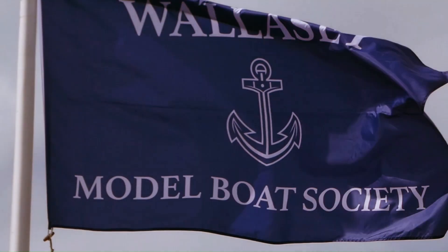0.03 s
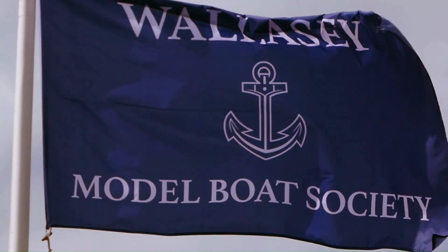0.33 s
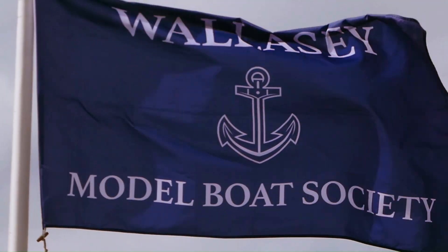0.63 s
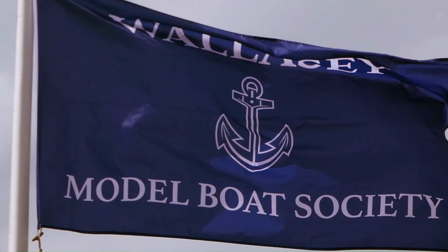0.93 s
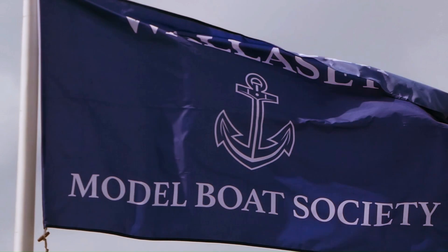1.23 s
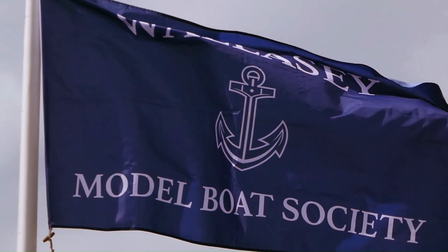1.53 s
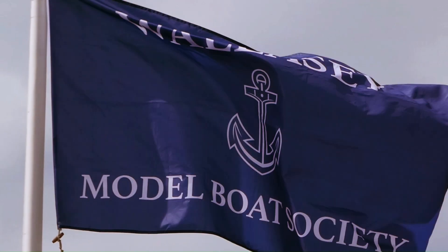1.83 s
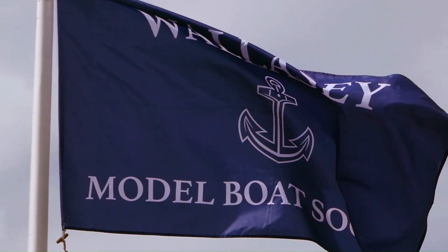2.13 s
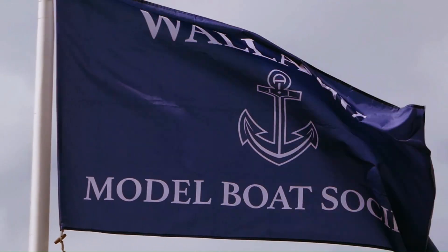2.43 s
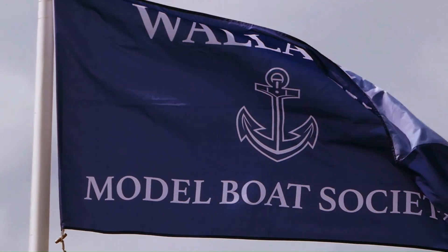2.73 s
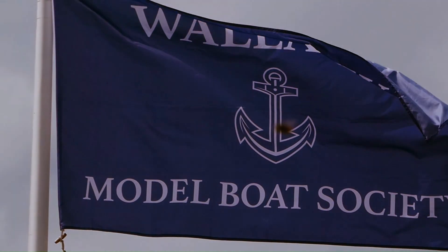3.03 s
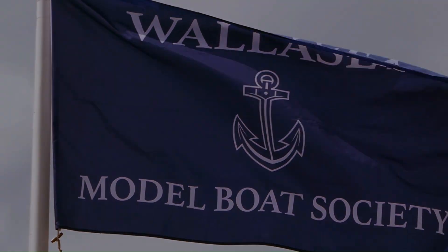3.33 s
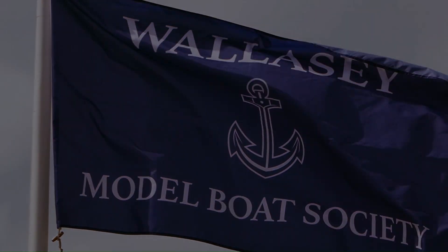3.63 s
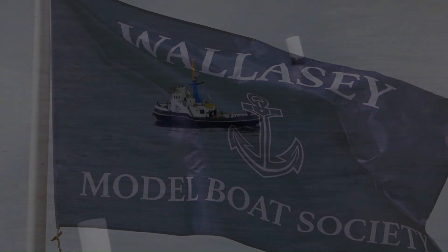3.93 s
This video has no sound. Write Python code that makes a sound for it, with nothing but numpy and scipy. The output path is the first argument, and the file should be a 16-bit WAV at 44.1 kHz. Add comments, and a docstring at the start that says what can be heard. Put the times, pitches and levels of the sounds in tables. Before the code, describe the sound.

A cloth flag flaps and snaps in gusty wind that buffets the microphone.

```python
"""Outdoors, close to a cloth flag in a gusty wind. About three times a second a fold runs out to the
free edge, swishing as it slides, and whips over: a pressure pulse, heard as a dull snap, followed by a
short flutter and a deep whump. Small creases pop in between, and the hem gives a few bright ticks.
Eddies buffet the microphone over a faint outdoor hiss, and the sound fades away at the end."""
import sys
import numpy as np
from scipy import signal
from scipy.fft import rfft, irfft
from scipy.io import wavfile

SR = 44100
rng = np.random.default_rng(int(sys.argv[2]) if len(sys.argv) > 2 else 0)


def materialize(psi):
    """Save the field psi as 16-bit PCM at rate SR to the path in sys.argv[1].

    A 1-D psi becomes a single channel; in a 2-D psi each row is a channel.
    """
    bounded = np.clip(np.atleast_2d(psi).T, -1, 1)
    quanta = np.round(bounded * 32767).astype(np.int16)
    wavfile.write(sys.argv[1], SR, quanta)


N = 176400
TIME = np.arange(N) / SR

# The cloth whips taut: (time [s], level before the low cut [dB], pulse width [ms],
# flutter relative to that level [dB], suction relative to the push [ratio])
SNAPS = [(0.064, -24.5, 1.38, -24, .85), (0.566, -35, 1.4, -22, 0), (0.5988, -30, 0.66, -15.5, 0.7),
         (0.615, -26.5, 0.87, -22, 0.07), (0.701, -28, 2.73, -25, 0.66), (0.951, -24.5, 0.26, -33, .1),
         (0.9599, -21, 1.26, -19, 0.1), (0.998, -23, 0.73, -25, .2), (1.0475, -14.5, 1.06, -21.5, 0.26),
         (1.1763, -25, 1, -7, .3), (1.1868, -24, 0.68, -16, 0.4), (1.1929, -20, 0.4, -17.5, 0.27),
         (1.2397, -25, 0.79, -14, 0.4), (1.2945, -4.5, 1.22, -18, 0.25), (1.3348, -27.5, 0.29, -6.5, .5),
         (1.3832, -23, 0.32, -13.5, 0), (1.5397, -1, 0.71, -16.5, 0.45), (1.552, -20.5, 0.46, -18, 0.6),
         (1.572, -14.5, 1.7, -16, 0.77), (1.6853, -33, 0.56, -11.5, 0.55), (1.727, -31, 0.74, -30, .3),
         (1.8532, -6, 1.31, -18.5, 0.4), (1.8955, -19, 0.87, -17, 0.5), (1.9095, -18.5, 0.65, -13, 0.2),
         (1.9243, -21, 0.67, -23, 0.45), (2.0357, -21, 1, -14.5, 0.4), (2.121, -17, 0.85, -24.5, 0.2),
         (2.1882, -16, 2.5, -25, 0.2), (2.195, -9.5, 2.27, -28.5, 0.17), (2.406, -22, 0.91, -13.5, 0.48),
         (2.5102, -17, 1.1, -15, .4), (2.5178, -9, 1.51, -21, 0.14), (2.548, -18, 1.13, -20, 0.3),
         (2.5596, -15.5, 2.4, -21, 0.6), (2.5714, -14, 1.4, -31, .5), (2.593, -31, 0.35, -8, 0.5),
         (2.6609, -34, 0.36, -15.5, 0), (2.715, -31.5, 0.89, -20, 0.2), (2.7859, -11.5, 0.81, -12.5, 0.14),
         (2.8185, -19, 0.57, -5, 0.49), (2.8235, -5.5, 1.33, -20.5, 0.58), (2.8443, -11, 2.06, -14.5, 0.35),
         (2.944, -34, 0.68, -1.5, 0.25), (3.0859, -21, 0.71, -8.5, 0.16), (3.0919, -13.5, 1.18, -15, 0.4),
         (3.1209, -19.5, 0.77, -17, 0.7), (3.1285, -21, 0.95, -10.5, 0.5), (3.262, -24, 2.7, -20, 0.1),
         (3.4017, -30.5, 0.59, -6, 0.1), (3.4214, -19.5, 0.9, -12.5, 0.1),
         (3.4434, -15.5, 0.63, -18.5, 0.26), (3.73, -23, 0.45, -6, .3), (3.7338, -18.5, 0.72, -17.5, .3),
         (3.894, -44.5, 1.05, -22, 0.2)]
# The free edge swings from side to side: (time [s], left minus right [dB])
EDGE_PAN = [(.6, -1), (1.25, 3.5), (2.1, -3.5), (2.5, -1), (3.1, -4.5), (3.7, 2.5)]
# Cracks of the hem: (time [s], peak level [dB], left minus right [dB], ring frequency [Hz])
HEM_TICKS = [(.951, -31, 18, 4000), (1.337, -27.5, 7.5, 1570), (1.3834, -39.5, -5, 3500),
             (1.544, -23.5, -2, 4000), (1.554, -24.5, -4, 2700), (1.905, -31, -1, 5000),
             (2.8167, -30.5, -9, 2500), (2.864, -37.5, -2, 2800), (3.0875, -34, -3, 1700)]

# Envelopes: (time [s], relative level [dB])
RIPPLE_LEVEL = [(0, -47.5), (.3, -62.5), (.87, -58.5), (.93, -32), (1.08, -37), (1.15, -42), (1.21, -52.5),
                (1.46, -36.5), (1.66, -41.5), (1.79, -45.5), (1.96, -36.5), (2.09, -47), (2.17, -35.5),
                (2.32, -49.5), (2.53, -31.5), (2.65, -42.5), (2.86, -38), (3.04, -45), (3.14, -39.5),
                (3.34, -50.5), (3.46, -37), (3.57, -51), (3.76, -38.5), (3.86, -56.5), (4, -54.5)]   # creases turning over
SWISH_LEVEL = [(0, -58), (.1, -56.5), (.29, -64), (.38, -62.5), (.5, -62), (.85, -61.5), (.97, -53),
               (1.1, -58.5), (1.26, -62), (1.34, -55.5), (1.48, -59.5), (1.55, -51), (1.63, -63.5),
               (1.8, -61.5), (1.91, -56.5), (2.0, -62.5), (2.19, -57), (2.3, -67), (2.44, -55), (2.54, -50),
               (2.62, -65), (2.74, -62), (2.83, -53), (2.92, -62), (3.03, -66), (3.12, -53.5), (3.24, -66),
               (3.35, -65.5), (3.44, -53.5), (3.51, -66), (3.62, -68.5), (3.77, -63), (3.85, -74), (4, -74)]   # cloth sliding on cloth
GUST_LEVEL = [(0, -34.5), (.11, -30.5), (.19, -51), (.28, -52.5), (.35, -43), (.46, -47), (.58, -49),
              (.68, -52.5), (.85, -50), (.95, -32.5), (1.02, -44), (1.2, -37), (1.38, -46.5), (1.56, -35),
              (1.75, -49), (1.88, -53), (2.08, -44), (2.17, -34.5), (2.28, -46), (2.42, -49.5),
              (2.54, -31.5), (2.66, -57), (2.85, -38), (2.98, -58), (3.1, -32.5), (3.22, -49.5),
              (3.35, -49), (3.44, -37.5), (3.53, -60), (3.73, -39.5), (3.84, -52.5), (4, -66)]   # wind on the microphone

# Spectra: (frequency [Hz], relative spectral density [dB])
FLUTTER_SPECTRUM = [(40, -34), (110, 5), (250, 3), (500, -1.5), (900, -17), (1600, -37), (4000, -39.5)]   # the shaking edge
CRINKLE_SPECTRUM = [(300, -10.5), (750, 4), (1500, -8), (2600, -17), (6000, -35.5), (11000, -39)]   # crisp creases
BILLOW_SPECTRUM = [(20, -12), (50, -7), (90, 2.5), (140, -4.5), (210, -2.5), (500, -39), (2000, -93)]   # the broad sheet
RIPPLE_SPECTRUM = [(40, -12), (100, 5), (200, 1), (400, -8), (800, -18.5), (1500, -29.5), (3000, -43.5),
                   (11000, -49.5)]   # soft creases
SWISH_SPECTRUM = [(300, 6.5), (900, 6), (1800, 2.5), (3000, 1), (4500, 2), (6000, -1.5), (8500, 1),
                  (11000, -3)]   # the rubbing weave
BUFFET_SPECTRUM = [(3, -11), (12, 5.5), (24, 3), (45, -5.5), (80, -9.5), (150, -27), (300, -44.5),
                   (1000, -75)]   # eddies at the microphone
SWELL_SPECTRUM = [(1, -5), (3, 3.5), (6, -1.5), (10, -8.5), (18, -24), (40, -53), (150, -76.5)]   # large, slow eddies
AIR_SPECTRUM = [(60, -7), (200, 18), (500, -24), (1000, 6), (2000, 0.5), (4000, -11), (11000, -13)]   # distant outdoor noise

SUCTION_LAG, SUCTION_SPREAD = 0.97, 1.57   # both in pulse widths
FLUTTER_RISE_S, FLUTTER_DECAY_S = 0.00052, 0.026
TICK_DECAY_CYCLES, TICK_BAND_OCTAVES = 1.28, 1.5
CRINKLE_GAIN_DB, BILLOW_GAIN_DB, SWISH_GAIN_DB = -16.5, -5, 4.5
BUFFET_GAIN_DB, SWELL_GAIN_DB, AIR_GAIN_DB = 9.5, -25.5, -69.5
CLOTH_SIDE_DB = -9   # stereo width: side relative to mid
FADE_IN_S, CUTOFF_HZ = 0.02, 11000


def snaps():
    """Sudden acceleration radiates a pulse: cloth whipping taut gives a push, then a broader suction."""
    out = np.zeros((2, N))
    for onset, db, width_ms, _, suction in SNAPS:
        age_in_widths = (TIME - onset) / (width_ms / 1000)
        pressure = pulse(age_in_widths) - suction * pulse((age_in_widths - SUCTION_LAG) / SUCTION_SPREAD)
        pan_db = np.interp(onset, *np.transpose(EDGE_PAN))
        out += panned(from_db(db) * pressure / pressure.max(), pan_db)
    low_cut = signal.butter(1, 58, "high", fs=SR, output="sos")
    return signal.sosfilt(low_cut, out)


def shaking(rise_s, decay_s, sharpness=0):
    """Incoherent vibrations add in power: the envelope all snaps leave. Sharpness favours narrow ones."""
    power = np.zeros(N)
    for onset, db, width_ms, flutter_db, _ in SNAPS:
        age = np.maximum(TIME - onset, 0)
        strength = from_db(db + flutter_db) / width_ms ** sharpness
        power += (strength * (1 - np.exp(-age / rise_s)) * np.exp(-age / decay_s)) ** 2
    return np.sqrt(power)


def flutter():
    """Damped vibration: after a snap the edge shakes itself out in a dying run of small pops."""
    pops = impulses(per_s=700, spread_db=0.5)
    return shaking(FLUTTER_RISE_S, FLUTTER_DECAY_S) * stereo(pops, FLUTTER_SPECTRUM, CLOTH_SIDE_DB)


def crinkles():
    """Buckling: a snap sets off a scatter of crisp creases, the louder the narrower its pulse."""
    creases = impulses(per_s=600, spread_db=2.5)
    envelope = shaking(FLUTTER_RISE_S, FLUTTER_DECAY_S, sharpness=0.98)
    return from_db(CRINKLE_GAIN_DB) * envelope * stereo(creases, CRINKLE_SPECTRUM, CLOTH_SIDE_DB)


def billow():
    """Inertia: the broad sheet follows each snap with a slower, deeper whump."""
    sheet = stereo(rng.standard_normal((2, N)), BILLOW_SPECTRUM, side_db=-32)
    return from_db(BILLOW_GAIN_DB) * shaking(rise_s=0.0088, decay_s=0.04) * sheet


def hem_ticks():
    """Heavily damped resonance: each crack of the stiff hem rings briefly in its own frequency band."""
    out = np.zeros((2, N))
    for onset, db, pan_db, hz in HEM_TICKS:
        time_constants = np.minimum(np.abs(TIME - onset) * hz / TICK_DECAY_CYCLES, 20)
        crack = rng.choice([-1, 1], N) * (TIME >= onset) * np.exp(-time_constants)
        band_hz = np.minimum(hz * 2 ** (TICK_BAND_OCTAVES * np.array([-.5, .5])), CUTOFF_HZ)
        resonance = signal.butter(2, band_hz, "band", fs=SR, output="sos")
        ring = signal.sosfilt(resonance, crack + 1e-18)
        out += panned(from_db(db) * ring / np.abs(ring).max(), pan_db)
    return out


def ripples():
    """Gentle buckling: small creases turn over all the time with soft, dull pops."""
    pops = impulses(per_s=600, spread_db=3)
    return level(RIPPLE_LEVEL) * stereo(pops, RIPPLE_SPECTRUM, CLOTH_SIDE_DB)


def swish():
    """Stick-slip friction: the weave rubs on itself in a stream of tiny slips, swelling with each fold."""
    slips = impulses(per_s=16000, spread_db=3)
    return from_db(SWISH_GAIN_DB) * level(SWISH_LEVEL) * stereo(slips, SWISH_SPECTRUM, side_db=-1.5)


def buffeting():
    """Turbulent pressure: eddies press on the microphone, deep, lumpy and partly unlike on each side."""
    eddies = stereo(rng.standard_normal((2, N)), BUFFET_SPECTRUM, side_db=-10.5)
    lumps_db = 0.5 * drift(points=40)
    return from_db(BUFFET_GAIN_DB + lumps_db) * level(GUST_LEVEL) * eddies


def swell():
    """Infrasound: large eddies pass slowly, so their pressure heaves mostly below the range of hearing."""
    eddies = stereo(rng.standard_normal((2, N)), SWELL_SPECTRUM, side_db=-3.5)
    return from_db(SWELL_GAIN_DB) * closing_fade() * eddies


def air():
    """Superposition: far-off outdoor sounds merge into a faint, steady noise, faded at the end."""
    hiss = stereo(rng.standard_normal((2, N)), AIR_SPECTRUM, side_db=-41)
    return from_db(AIR_GAIN_DB) * closing_fade() * hiss


def closing_fade(start_s=2.72, db_per_s=9.5):
    """Exponential decay: a gain that holds, then loses equal decibels in equal times."""
    return from_db(-db_per_s * np.maximum(TIME - start_s, 0))


def pulse(x, roundness=3.8):
    """A bell-shaped pulse of height 1, about one unit wide; low roundness makes it pointed."""
    return (1 + 4 * x ** 2 / roundness) ** -roundness


def impulses(per_s, spread_db):
    """Shot noise: two independent trains of randomly timed clicks, mostly small, a few large."""
    trains = []
    for _ in range(2):
        sizes = from_db(spread_db * np.minimum(rng.exponential(1, N), 4))
        signs = rng.choice([-1, 1], N)
        trains.append(sizes * signs * (rng.random(N) < per_s / SR))
    return trains


def drift(points):
    """Slow random modulation: straight lines between evenly spaced Gaussian values."""
    return np.interp(TIME, np.linspace(0, TIME[-1], points), rng.standard_normal(points))


def coloured(excitation, spectrum):
    """Source and filter: a minimum-phase filter imposes the spectrum on the excitation; rms 1."""
    hz, db = np.transpose(spectrum)
    bin_hz = np.maximum(np.arange(N // 2 + 1) * SR / N, .1)
    magnitude = from_db(np.interp(np.log(bin_hz), np.log(hz), db))
    cepstrum = irfft(np.log(magnitude), N)
    cepstrum[1:N // 2] *= 2   # folding onto positive time makes the filter causal
    cepstrum[N // 2 + 1:] = 0
    response = np.exp(rfft(cepstrum))
    sound = irfft(rfft(excitation - excitation.mean()) * response, N)
    return sound / sound.std()


def stereo(excitations, spectrum, side_db):
    """Mid-side stereo: the sum and difference of two independent, coloured signals; rms about 1."""
    mid, side = (coloured(x, spectrum) for x in excitations)
    width = from_db(side_db)
    return np.array([mid + width * side, mid - width * side]) / np.hypot(1, width)


def panned(mono, db):
    """A level difference between left and right gives a sound its direction."""
    return np.outer(from_db([db / 2, -db / 2]), mono)


def level(envelope):
    """Amplitude gain along a curve of (time [s], level [dB])."""
    return from_db(np.interp(TIME, *np.transpose(envelope)))


def from_db(db):
    """Amplitude ratio: a factor of ten for every 20 dB."""
    return 10 ** (np.asarray(db) / 20)


def scene():
    """Linear superposition: the pressures of the flag, the wind and the open air add."""
    flag = snaps() + flutter() + crinkles() + billow() + hem_ticks() + ripples() + swish()
    return flag + buffeting() + air() + swell()


def record(dry):
    """Band limiting: after a very short fade-in, a steep low-pass filter removes the highest treble."""
    fade_in = np.sin(np.pi / 2 * np.minimum(TIME / FADE_IN_S, 1)) ** 2
    low_pass = signal.ellip(12, .1, 80, CUTOFF_HZ, fs=SR, output="sos")
    return signal.sosfilt(low_pass, dry * fade_in)


dry = scene()
out = record(dry)
materialize(out)
```